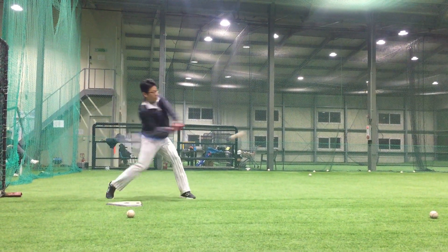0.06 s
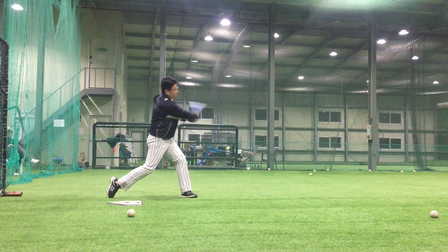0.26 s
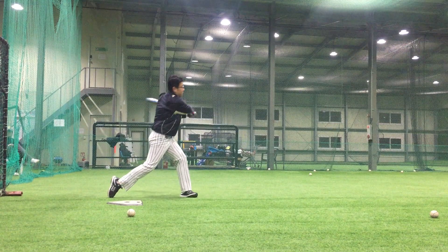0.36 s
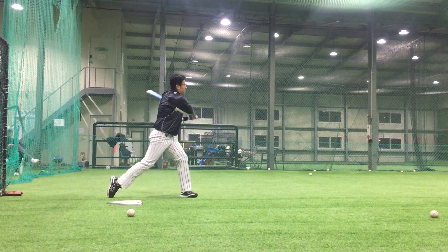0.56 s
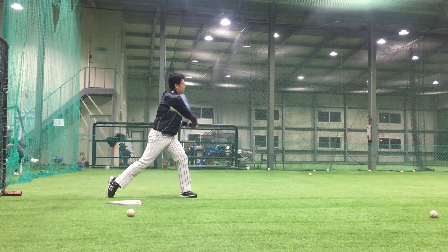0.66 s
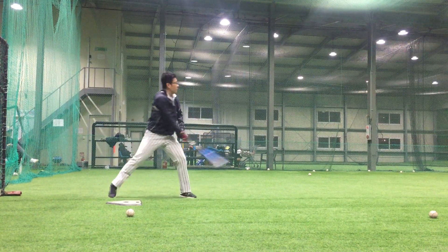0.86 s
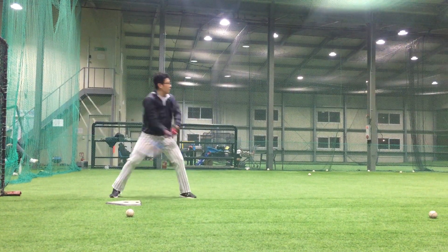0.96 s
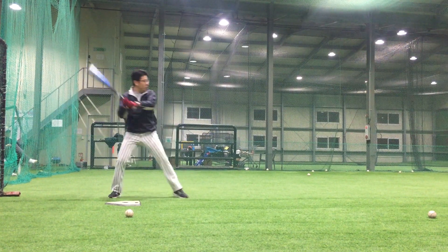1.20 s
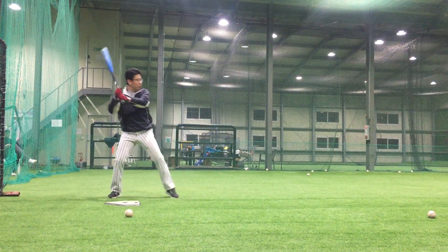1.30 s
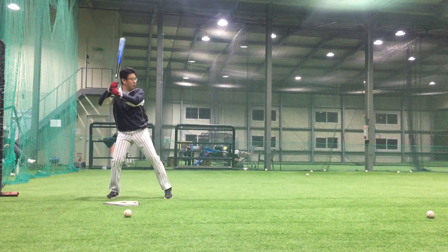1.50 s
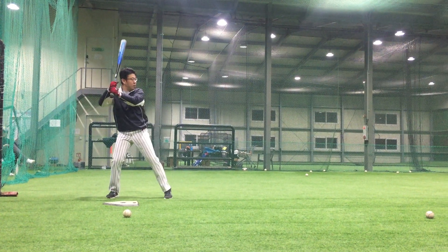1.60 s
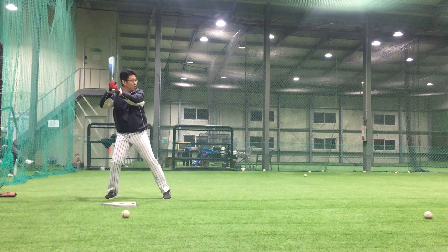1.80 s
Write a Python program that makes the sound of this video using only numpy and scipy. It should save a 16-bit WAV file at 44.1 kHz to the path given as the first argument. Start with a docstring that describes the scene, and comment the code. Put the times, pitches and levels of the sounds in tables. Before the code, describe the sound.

A metal bat strikes a baseball with a sharp ringing ping in a large indoor hall

```python
"""A metal bat hits a baseball in a large indoor training hall: noise bursts and a tick crack, sine modes ring.
The swing bends the ping's pitch and sweeps its beam past; the hall returns it as a cluster of close tones.
The ball then knocks against something at the far end: a clatter of short noise bursts with a hall tail.
Shaped noise makes the bat's whoosh, faint swishes of clothes, the hall's air and low rumble, and a late boom."""
import sys
import numpy as np
from scipy import signal
from scipy.fft import rfft, irfft
from scipy.io import wavfile

SR = 44100
rng = np.random.default_rng(int(sys.argv[2]) if len(sys.argv) > 2 else 0)


def store_pcm(level_fs):
    """Save levels as 16-bit WAV."""
    pcm = np.round(np.clip(level_fs, -1, 1) * 32767).astype(np.int16)
    wavfile.write(sys.argv[1], SR, np.atleast_2d(pcm).T)


N = 81585
TIME = np.arange(N) / SR
FREQS = np.maximum(np.fft.rfftfreq(2 * 2 ** 16, 1 / SR), 1)   # noise bins in Hz, kept above zero for the log

# All levels are mix levels, ahead of the limiter.
# Steady air of the hall: colour [f/Hz, level/dB] and its drift [t/s, level/dB]
AIR_COLOUR = [(30, -41.5), (240, -34), (450, -40), (950, -36.5), (1600, -53), (3500, -61.5), (8000, -77.5),
              (15000, -77.5)]
AIR_DRIFT = [(0, -3), (.2, 0.5), (.7, -3.5), (1.3, 4), (1.85, -0.5)]
# Low rumble: colour [f/Hz, level/dB] and its drift [t/s, level/dB]
RUMBLE_COLOUR = [(20, -68), (38, -39), (58, -22), (100, -20), (170, -29), (280, -30.5), (500, -47.5),
                 (2000, -93.5)]
RUMBLE_DRIFT = [(0, -3), (.35, 1.5), (.65, 2), (1.0, 0.5), (1.3, -3.5), (1.45, 3.5), (1.85, 1)]
# Deep boom that swells after the knock [f/Hz, level/dB]
BOOM_COLOUR = [(25, -56), (55, -14.5), (80, -9.5), (130, -31), (300, -78)]
BOOM_S, BOOM_WIDTH_S = 1.304, 0.098
# Swishes of clothes: moments [t/s, width/s, level/dB] and colour [f/Hz, level/dB]
SWISH_MOMENTS = [(.06, 0.027, -11.5), (0.152, 0.045, -4), (1.052, 0.14, -8.5), (1.78, 0.036, -19)]
SWISH_COLOUR = [(800, -54.5), (2000, -50), (4000, -51.5), (8000, -59), (15000, -69)]
# Bat cutting the air around contact [f/Hz, level/dB]
WHOOSH_COLOUR = [(40, -39), (70, -13), (140, -33), (400, -34), (1000, -33.5), (2000, -35.5), (5000, -44.5),
                 (15000, -59.5)]
WHOOSH_RISE_S = 0.0194   # time constant, the same rising and falling
# Reverberation of the hall [f/Hz, t60/s]
HALL_T60 = [(150, 1.63), (700, 1.07), (1400, 1.49), (2000, 2.04), (3000, 1.497), (4500, 0.99), (7000, 0.62),
            (10000, 0.41), (15000, 0.2)]
HALL_BUILD_S = 0.004     # time constant of the onset
# Far knock: touches of the clatter [t/s, level/dB] and their colour [f/Hz, level/dB]
KNOCK_TOUCHES = [(1.1418, -4.5), (1.149, -12), (1.168, -4), (1.1736, -3), (1.185, -18), (1.21, -10.5)]
KNOCK_COLOUR = [(300, -27.5), (1500, -29), (2500, -23), (3200, -23), (4500, -39), (5700, -31), (7700, -37),
                (10000, -51), (15000, -52)]
KNOCK_T60_S = 0.045      # each touch
# The knock as the hall returns it: colour [f/Hz, level/dB] and decay [f/Hz, t60/s]
KNOCK_HALL_COLOUR = [(500, -43), (1500, -36.5), (2500, -33.5), (3200, -29.5), (4500, -39), (5700, -40.5),
                     (7500, -48), (10000, -53), (15000, -64)]
KNOCK_HALL_T60 = [(2000, 1.7), (3200, 0.86), (5500, 0.92), (8000, 0.53), (14000, 0.34)]
KNOCK_HALL_DELAY_S = 0.0087
# Ringing of the barrel; the first mode is the ping [f/Hz, level/dB, t60/s]
BAT_MODES = [(1903, -1, 0.17), (292, -33.5, 0.12), (704, -26.5, 0.063), (946, -26, 0.03), (1115, -24, 0.1),
             (3090, -18.5, .16), (3987, -17.5, 0.054), (5210, -25, 0.069), (5280, -30.5, 0.065),
             (6740, -38, 0.19)]
# The ping leaves the moving bat at another pitch in each direction [starting f/Hz, delay/s, level/dB]
HALL_PATHS = [(1857, .03, -5.5), (1910, .2, -8.5), (1898, .04, -2.5), (1965, .12, -5.5), (2006, .27, -6.5),
              (2007, .09, -5)]
SWING_SLOWS_S = 2.3      # time constant
# The ping on the straight path as the barrel swings round [t/s, f/Hz, level/dB]
PING_PATH = [(.248, 1835, -11), (.254, 1914, -13.5), (.26, 1818, -10), (.27, 1870, -19.5), (.275, 1911, -1),
             (.28, 1823, -21), (.285, 1890, -1), (.301, 1850, -9), (.313, 1898, -2), (.319, 1828, -18.5),
             (.34, 1938, -24), (.42, 1911, -72)]
OVERTONES_DB = -1        # trim of the other modes on the straight path
# Crack of the contact: colour [f/Hz, level/dB] and decay [f/Hz, t60/s]
CRACK_COLOUR = [(60, -21.5), (140, -8), (260, 9.5), (480, -3.5), (720, 8), (1200, 1.5), (2500, 7.5),
                (4000, 6.5), (6000, -0.5), (8500, 0.5), (11000, -12.5), (16000, -7)]
CRACK_T60 = [(200, 0.03), (1000, 0.031), (3500, 0.0053), (7000, 0.0032), (15000, 0.0058)]
# The first instant of contact: a needle-sharp tick
TICK_DB, TICK_HZ, TICK_T60_S = -3.5, 8100, 0.00091
# Scatter from the turf and the batter, right behind the crack [f/Hz, level/dB]
SCATTER_COLOUR = [(100, -10.5), (300, -15), (700, -14.5), (1400, -40), (3000, -12), (5000, -11),
                  (7500, -22.5), (10000, -26), (15500, -29.5)]
SCATTER_T60_S = 0.063
# Echoes from the near wall and nets: arrivals [delay t/s, level/dB] and colour [f/Hz, level/dB]
NEAR_ECHOES = [(.0243, -12.5), (.028, -16.5), (0.031, -14)]
ECHO_COLOUR = [(80, -20), (280, 5), (550, 1), (850, 11), (1500, -4.5), (2800, 9.5), (4000, -2.5),
               (5500, -8.5), (7500, -23), (15500, -24.5)]
ECHO_T60_S = 0.093
# The crack as the hall returns it [f/Hz, level/dB]
CRACK_HALL_COLOUR = [(80, -26), (250, -18), (500, -19.5), (850, -19.5), (1400, -13), (2500, -16.5),
                     (3200, -12), (3550, -24.5), (4200, -18), (4750, -26), (5500, -18.5), (6300, -30),
                     (7100, -29), (10000, -35.5), (15500, -47.5)]
CRACK_HALL_DELAY_S = 0.018

HIT_S, HIT_DB = 0.2482, 7.5   # moment and strength of the blow
LOW_CUT_HZ, TOP_STOP_HZ = 38, 16700   # the top is 60 dB down from TOP_STOP_HZ up
CEILING = 2.014               # amplitude where peaks flatten out, ahead of the limiter
LIMIT_DB, RELEASE_DB_PER_S = -2.5, 10


def from_db(db):
    """Decibels to gain."""
    return 10 ** (np.asarray(db) / 20)


def in_time(rows):
    """Reads each value column of a time curve at every sample."""
    s, *columns = np.transpose(rows)
    return [np.interp(TIME, s, column) for column in columns]


def at_hz(points, hz):
    """Reads a table on a log-frequency axis."""
    f, value = np.transpose(points)
    return np.interp(np.log(hz), np.log(f), value)


def dying(t60):
    """Exponential decay that falls 60 dB in t60 seconds."""
    return np.exp(-np.log(1000) * np.minimum(TIME / t60, 10))


def swell(s, width):
    """A bell-shaped rise and fall around a moment."""
    return np.exp(-.5 * ((TIME - s) / width) ** 2)


def delayed(x, s):
    """The sound, starting s seconds later."""
    silence = np.zeros(max(int(s * SR), 0))
    return np.concatenate([silence, x])[:N]


def noise_bins(colour=None):
    """Spectrum of fresh noise, white unless a colour is given."""
    white = rfft(rng.standard_normal(2 * len(FREQS) - 2))
    return white if colour is None else white * from_db(at_hz(colour, FREQS))


def noise(colour):
    """Steady coloured noise."""
    return irfft(noise_bins(colour))[:N]


def dying_noise(t60s, colour=None, count=16):
    """A burst of noise whose overlapping bands each die at their own rate."""
    bins = noise_bins(colour)
    centres = np.geomspace(125, 16000, count)
    burst = 0
    for hz, peak in zip(centres, np.eye(count)):
        # each band is a triangle that crossfades into its neighbours
        share = np.interp(np.log(FREQS), np.log(centres), peak)
        burst = burst + irfft(bins * share)[:N] * dying(at_hz(t60s, hz))
    return burst


def air():
    """Steady air of the hall: coloured noise with a slow drift in level."""
    return noise(AIR_COLOUR) * from_db(in_time(AIR_DRIFT)[0])


def rumble():
    """Low rumble of the hall: bass noise with a slow drift in level."""
    return noise(RUMBLE_COLOUR) * from_db(in_time(RUMBLE_DRIFT)[0])


def boom():
    """One deep swell of bass noise after the knock."""
    return noise(BOOM_COLOUR) * swell(BOOM_S, BOOM_WIDTH_S)


def clothes():
    """Soft hiss of clothes as the batter swings and recovers: noise in bell-shaped swells."""
    motion = sum(from_db(db) * swell(s, width) for s, width, db in SWISH_MOMENTS)
    return noise(SWISH_COLOUR) * motion


def whoosh():
    """The bat cuts the air: noise that swells exponentially to contact and dies away as fast."""
    return noise(WHOOSH_COLOUR) * np.exp(-np.abs(TIME - HIT_S) / WHOOSH_RISE_S)


def hall_tail(colour=None, t60s=HALL_T60):
    """The hall's diffuse answer to a click: noise that builds quickly and dies band by band."""
    return dying_noise(t60s, colour) * (1 - np.exp(-TIME / HALL_BUILD_S))


def hall(x):
    """Reverberation of a sound: convolution with a fresh diffuse tail."""
    return signal.fftconvolve(x, hall_tail())[:N] / np.sqrt(SR)


def far_knock():
    """The ball knocks at the far end: a clatter of short bursts and its tail in the hall."""
    clatter = 0
    for s, db in KNOCK_TOUCHES:
        touch = noise(KNOCK_COLOUR) * dying(KNOCK_T60_S)
        clatter = clatter + from_db(db) * delayed(touch, s)
    tail = hall_tail(KNOCK_HALL_COLOUR, KNOCK_HALL_T60)
    first_touch_s = KNOCK_TOUCHES[0][0]
    return clatter + delayed(tail, first_touch_s + KNOCK_HALL_DELAY_S)


def ring(modes, doppler):
    """Decaying sine modes of the barrel, their pitch scaled by the Doppler ratio."""
    clock = np.cumsum(doppler * np.ones(N)) / SR   # seconds, stretched by the ratio
    return sum(from_db(db) * dying(t60) * np.sin(2 * np.pi * hz * clock) for hz, db, t60 in modes)


def ping_in_hall():
    """Each direction feeds the hall its own Doppler shift, which shrinks as the swing slows."""
    ping_hz = BAT_MODES[0][0]
    cluster = 0
    for hz, delay, db in HALL_PATHS:
        doppler = 1 + (hz / ping_hz - 1) * np.exp(-TIME / SWING_SLOWS_S)
        path = hall(ring(BAT_MODES, doppler))
        cluster = cluster + from_db(db) * delayed(path, HIT_S + delay)
    return cluster


def ping():
    """The barrel heard directly: the swing bends the ping's pitch and its sweeping beam varies the level."""
    hz, db = in_time(PING_PATH)
    tone = from_db(db) * np.sin(2 * np.pi * np.cumsum(hz) / SR) * (TIME > HIT_S)
    overtones = ring(BAT_MODES[1:], 0.99)   # a touch flat
    return tone + from_db(OVERTONES_DB) * delayed(overtones, HIT_S)


def crack():
    """The contact: a tick and a noise burst, then close scatter, near echoes and a hall tail."""
    tick = from_db(TICK_DB) * dying(TICK_T60_S) * np.cos(2 * np.pi * TICK_HZ * TIME)
    burst = dying_noise(CRACK_T60, CRACK_COLOUR)
    scatter = noise(SCATTER_COLOUR) * dying(SCATTER_T60_S)
    echoes = 0
    for s, db in NEAR_ECHOES:
        echo = noise(ECHO_COLOUR) * dying(ECHO_T60_S)
        echoes = echoes + from_db(db) * delayed(echo, s)
    tail = delayed(hall_tail(CRACK_HALL_COLOUR), CRACK_HALL_DELAY_S)
    return delayed(tick + burst + scatter + echoes + tail, HIT_S)


def scene():
    """Everything at one microphone."""
    background = air() + rumble() + boom()
    hit = from_db(HIT_DB) * (crack() + ping() + ping_in_hall())
    return (background + clothes() + whoosh() + far_knock() + hit)[None]


def limiter(x):
    """Turns down at once on a peak and comes back slowly, which holds down what follows."""
    over_db = np.maximum(20 * np.log10(np.abs(x) + 1e-9) - LIMIT_DB, 0)
    recovery = RELEASE_DB_PER_S * TIME
    # the running maximum keeps whichever peak still asks for the most reduction
    reduction_db = np.maximum.accumulate(over_db + recovery, axis=-1) - recovery
    return x * from_db(-reduction_db)


def record(dry):
    """The deepest bass is cut, the loudest peaks are flattened, the limiter acts and the top is cut."""
    low_cut = signal.butter(4, LOW_CUT_HZ, "high", fs=SR, output="sos")
    x = signal.sosfilt(low_cut, dry)
    flattened = x / (1 + (x / CEILING) ** 4) ** .25
    top_cut = signal.cheby2(14, 60, TOP_STOP_HZ, fs=SR, output="sos")
    return signal.sosfilt(top_cut, limiter(flattened))


dry = scene()
out = record(dry)
store_pcm(out)
```